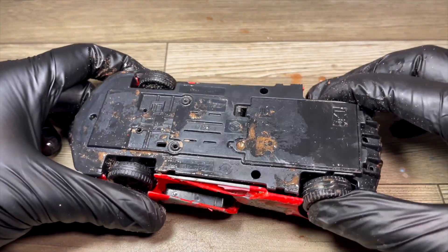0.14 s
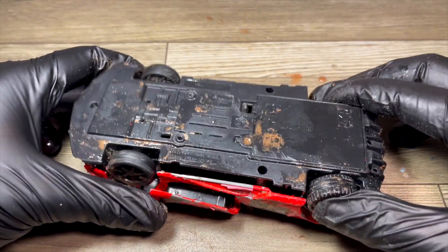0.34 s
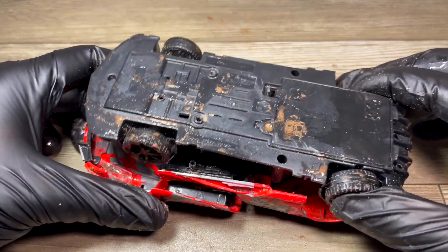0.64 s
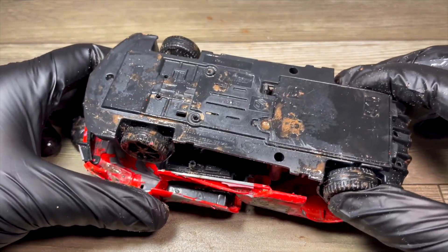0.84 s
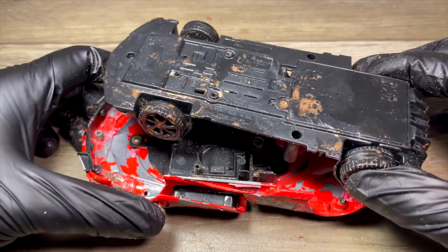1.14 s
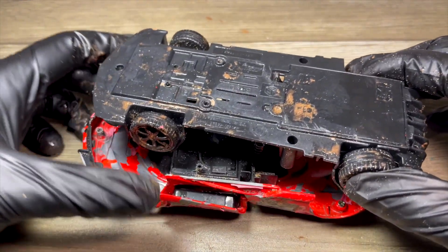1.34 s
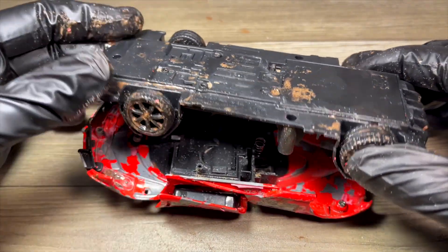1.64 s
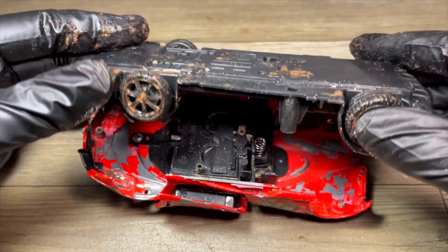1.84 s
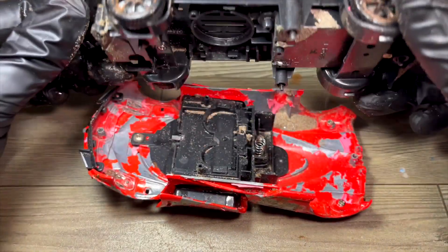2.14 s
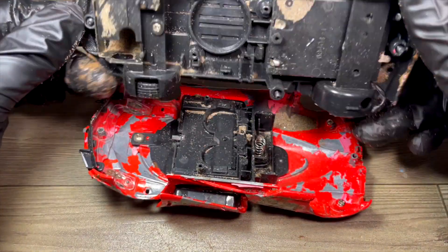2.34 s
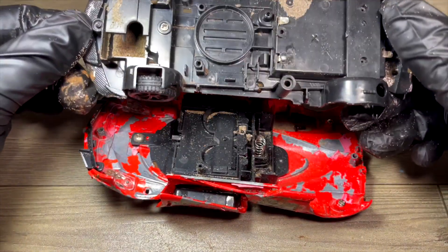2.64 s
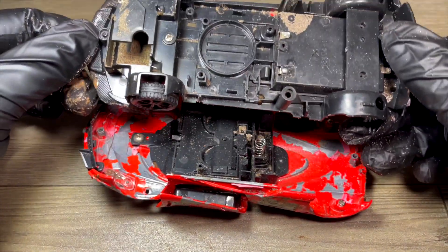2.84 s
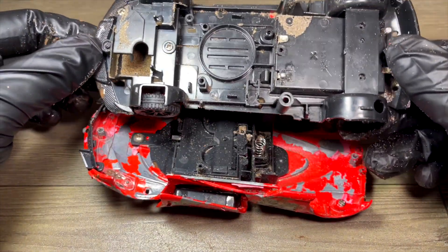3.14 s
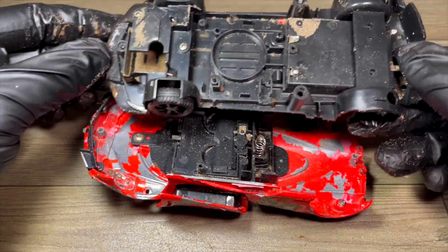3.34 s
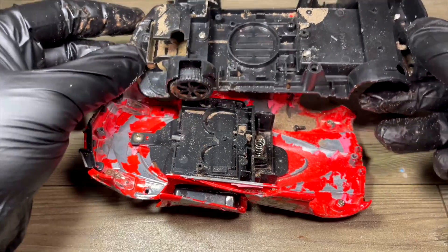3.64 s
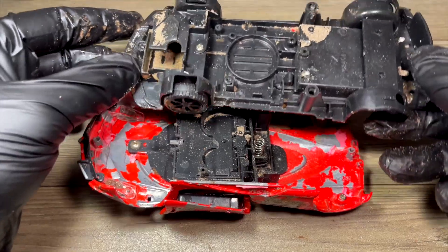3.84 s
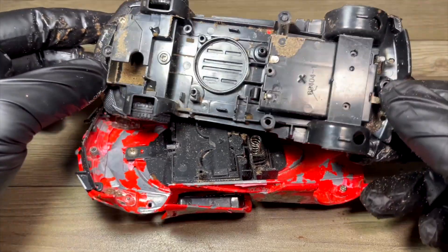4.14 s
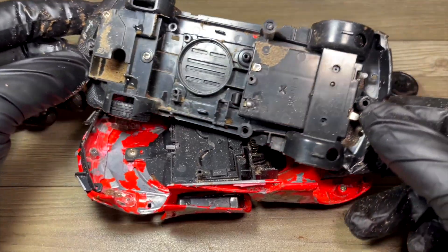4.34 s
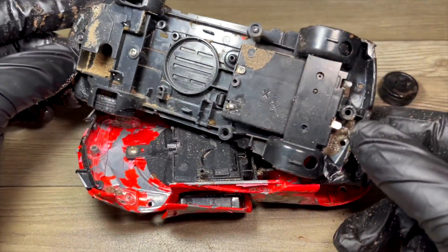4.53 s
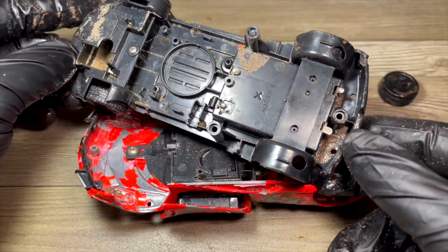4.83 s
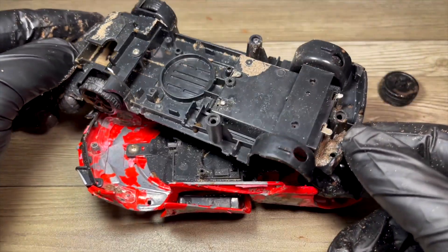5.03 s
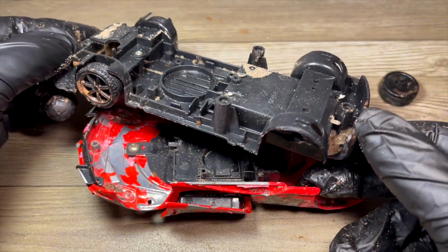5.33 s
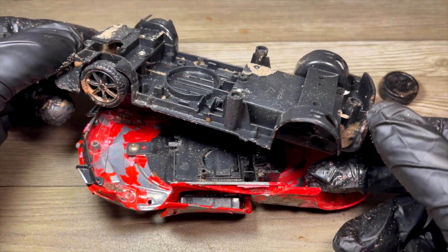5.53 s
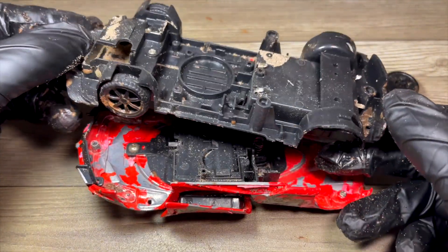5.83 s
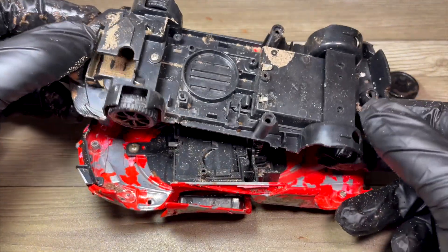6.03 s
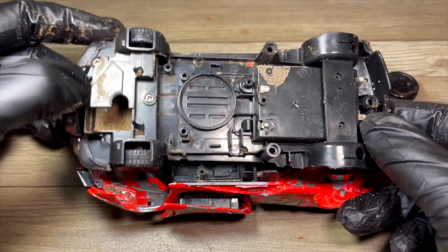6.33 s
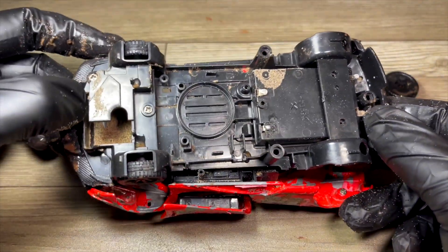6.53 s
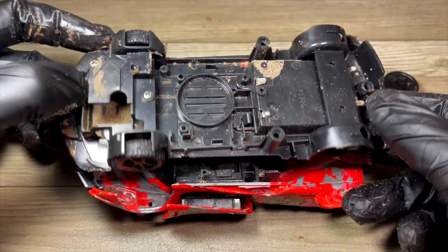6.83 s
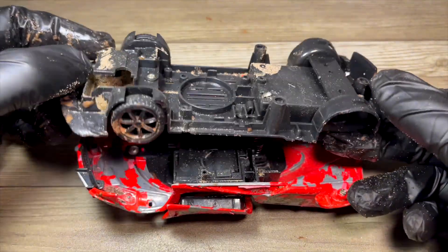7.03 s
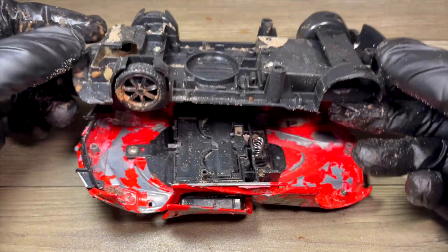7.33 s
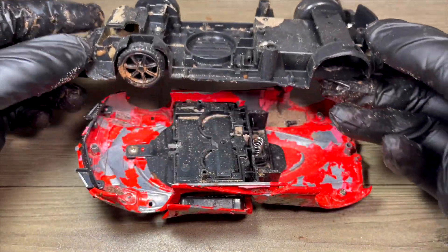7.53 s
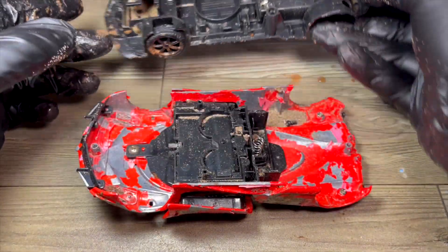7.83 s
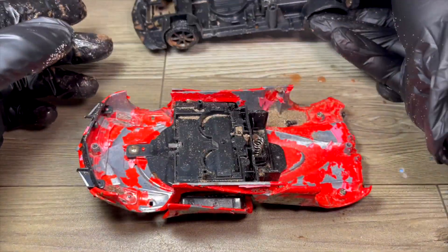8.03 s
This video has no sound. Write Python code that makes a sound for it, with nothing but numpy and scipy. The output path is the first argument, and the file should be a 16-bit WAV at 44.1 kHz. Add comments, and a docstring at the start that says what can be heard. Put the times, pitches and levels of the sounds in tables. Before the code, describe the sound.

Thin plastic parts click, scuff and rub in gloved hands over a wooden table. It begins busy, with a loud snap and dull thumps, thins out, then has two bright snaps near the third second. Light grit and drags lead to a strong crack and short clatter, then gentle scraping and a few last ticks. Dry, close stereo pickup with soft low room rumble.

```python
"""Gloved hands and a toy car chassis

Rubber-gloved hands lift the plastic chassis off a toy car body, turn it over and set it aside on a wooden table.
Clips and loose parts click as short rattles of force through damped modes; scuffs, drags and gloves drive
plastic with gritty noise. Dull thumps are resonant noise, the low room rumble is shaped noise,
and a close two-port microphone colours it all.
"""
import sys
import numpy as np
from scipy import signal
from scipy.fft import rfft, irfft, next_fast_len
from scipy.io import wavfile
from scipy.ndimage import uniform_filter1d

SR = 44100
rng = np.random.default_rng(int(sys.argv[2]) if len(sys.argv) > 2 else 0)


def unload_audio(sound):
    """Save the sound as a 16-bit wav file, at the path given as the first command line argument."""
    columns = np.transpose(np.atleast_2d(sound))
    # keep every value between -1 and 1, then stretch to whole-number steps
    steps = np.round(np.clip(columns, -1, 1) * 32767)
    wavfile.write(sys.argv[1], SR, steps.astype(np.int16))


N = 360297

# gloves sliding on plastic: (time [s], hiss level [dB], chassis ring before trim [dB re hiss])
RUBBING = [(0, -50.5, -4.5), (.33, -53.5, -0.5), (.42, -49.5, -0.5), (.54, -70.5, -1.5), (.8, -65, -4.5),
           (.92, -75.5, 1.5), (1.0, -67, -1.5), (1.23, -83, 2.5), (1.29, -65, -10), (1.39, -62.5, -10.5),
           (1.52, -74, -3.5), (1.58, -58, -18), (2.14, -46.5, -13.5), (2.55, -54.5, -11),
           (2.66, -69, -13.5), (2.74, -61.5, -16.5), (2.9, -57, -20), (3.16, -49.5, -13),
           (3.57, -59.5, -10), (3.75, -56.5, -8.5), (4.43, -55, -7.5), (4.71, -65.5, 1), (5.0, -60, -10.5),
           (5.48, -65, -19.5), (5.56, -72, -15.5), (5.8, -57, -28.5), (6.1, -67, -14), (6.32, -55, -9.5),
           (6.58, -66.5, -0.5), (6.8, -57.5, -13.5), (6.95, -55, -13), (7.0, -65.5, -9.5),
           (7.14, -56, -10.5), (7.24, -72, -2.5), (7.53, -70.5, 1.5), (7.85, -59, -5.5), (7.9, -78, 0),
           (8.17, -79, -8)]
# hollow low modes of the chassis: (frequency [Hz], level [dB], undamped t60 [s])
HOLLOW_MODES = [(647.25, -14.5, 0.033), (1093, -6.5, 0.027), (1403.6, -2, 0.011), (1504, -9.5, .2),
                (1636.4, -7, .02), (1970, -3, 0.011), (2230, -4, 0.0076)]
# bright plate modes of the chassis: (frequency [Hz], level [dB], undamped t60 [s])
PLATE_MODES = [(2904, -5.5, 0.0068), (3085, -8.5, 0.061), (3468, -10.5, .01), (3943, -3, 0.0092),
               (4540, -6.5, 0.0045), (4880, -4.5, 0.0051), (5200, -5, 0.014), (5780, -10.5, 0.0066)]
PORTS = np.array([[1], [-1]])  # left, right


def undb(db):
    """Decibels to gain."""
    return 10 ** (np.asarray(db) / 20)


def unit(x):
    """Scale to rms 1."""
    return x / np.sqrt(np.mean(x ** 2))


def curves(table):
    """Columns of a time table, one value a sample."""
    s, *columns = np.transpose(table)
    return [np.interp(np.arange(N) / SR, s, column) for column in columns]


def over_hz(table, hz):
    """A spectrum read on a log-frequency axis."""
    f, value = np.transpose(table)
    return np.interp(np.log(hz + 1), np.log(f + 1), value)


def walk(rate):
    """Random levels held 1 / rate s and slewed; spread a little under 1."""
    hold = int(SR / rate)
    steps = np.repeat(rng.standard_normal(N // hold + 1), hold)
    return uniform_filter1d(steps, hold)[:N]


def grit(size, grain_db):
    """Friction force: noise in millisecond grains of very uneven size."""
    grains = np.minimum(rng.exponential(size=size // 44 + 1), 4.5)
    return rng.standard_normal(size) * undb(grain_db * np.repeat(grains, 44)[:size])


def modes(table, hz, share, spread_db):
    """Response of damped modes; each one's share sets its sign and, through the spread, its strength."""
    f, db, t60 = np.transpose(table)
    damp = np.log(1000) / t60 / (2 * np.pi)
    gain = undb(db + spread_db * share) * np.sign(np.sin(1000 * share))
    damp, f = damp[:, None], f[:, None]
    return gain @ (damp / (damp + 1j * (hz - f)) + damp / (damp + 1j * (hz + f)))


def nearness(f, ring_hz, octaves):
    """How near frequencies lie to a pitch: 1 on it, falling to 0 within a few widths."""
    return np.exp(-(np.log2(f / ring_hz) / octaves) ** 2)


def favour(table, ring_hz, focus_db, octaves):
    """The modes near a given pitch ring louder: the place of the contact."""
    return [(f, db + focus_db * nearness(f, ring_hz, octaves), t60) for f, db, t60 in table]


def edge(hz, corner_hz):
    """Second-order high-pass: the bright crack of a contact."""
    b, a = signal.butter(2, 2 * np.pi * corner_hz, "high", analog=True)
    return signal.freqs(b, a, 2 * np.pi * hz)[1]


def darken(hz, corner_hz):
    """Steep low-pass: darkens the sound above a corner frequency."""
    b, a = signal.cheby1(8, 1, 1, analog=True)
    return signal.freqs(b, a, hz / corner_hz)[1]


def room(flicker_db=2.5, follow=0.49, apart_hz=1500):
    """Low rumble that swells with its level curve, over a faint wavering hush; the bass is nearly alike at both ports."""
    # rumble of the room, lower later on: (time [s], level [dB])
    rumble_levels = [(0, -47.5), (1.8, -51), (2.8, -48.5), (5.9, -55.5), (8.17, -52.5)]
    # tone of the room noise, before it is scaled to the rumble: (frequency [Hz], density [dB per Hz])
    room_tone = [(8.8, -34), (15, -12), (50, 0), (90, -2.5), (128, -22), (170, -33), (268, -31), (400, -47),
                 (712, -52), (1330, -49), (4670, -53), (9000, -55), (12000, -70)]
    hz = np.fft.rfftfreq(N, 1 / SR)
    mid, side = rfft(rng.standard_normal((2, N))) * undb(over_hz(room_tone, hz))
    both = mid + np.minimum(0.025 + hz / apart_hz, 1) * side * PORTS
    low = 1 / (1 + (hz / 130) ** 4)
    scale = np.std(irfft(mid * low, N))
    rumble_db, = curves(rumble_levels)
    rumble = irfft(both * low, N) * undb(rumble_db + flicker_db * walk(8.4))
    # the hush follows only part of the rumble's rise and fall
    mean_db = np.mean(rumble_db)
    hush_db = mean_db + follow * (rumble_db - mean_db)
    hush = irfft(both * (1 - low), N) * undb(hush_db + flicker_db * walk(5.8))
    return (rumble + hush) / scale


def thumps(t60=.09, rise_s=0.005, width=0.22, middle_hz=188, scatter=0.14):
    """The table top gives a short dull shudder under each push of the hands: noise through one resonance."""
    # hands on the table: (time [s], level before a 10 dB lift [dB])
    thump_table = [(.16, -58), (.219, -54), (.4, -61.5), (.713, -66), (1.079, -60), (3.723, -56),
                   (3.867, -64), (4.072, -60), (4.3, -61.5), (4.36, -59.5), (4.42, -60), (4.999, -67),
                   (5.293, -65), (6.5, -67), (6.82, -67.5), (7.07, -66), (8.0, -67)]
    t = np.arange(int(t60 * SR)) / SR
    out = np.zeros(N + len(t))
    for s, level_db in thump_table:
        hz = middle_hz * np.exp(scatter * rng.standard_normal())
        b, a = signal.iirpeak(hz, 1 / width, SR)
        shudder = signal.lfilter(b, a, rng.standard_normal(8192))[-len(t):]
        decay = undb(level_db + 10.0 - 60 * t / t60)
        i = int(s * SR)
        out[i:i + len(t)] += decay * (1 - np.exp(-t / rise_s)) * unit(shudder)
    return out[:N]


def drags(grain_db=4.0, spread_db=0.0):
    """Stick-slip grit between chassis and car body rings the damped modes of the shell."""
    # chassis across the body: (time [s], swell length, cut at 0.19 s [s], level [dB])
    drag_table = [(4.277, 0.05, -57), (4.398, 0.1, -54), (6.127, 0.3, -68.5), (6.236, 0.1, -59),
                  (6.278, 0.1, -59), (6.365, 0.3, -61.5)]
    # what the body shell rings with: (frequency [Hz], level [dB], t60 [s])
    shell_modes = [(1173, -8.5, 0.016), (1315, -7, 0.022), (2520, -7.5, 0.03), (3090, -3, 0.0099),
                   (3480, -2.5, 0.0084), (5200, -2.5, 0.01636), (6840, -9.5, 0.0089)]
    size = 8192
    t, hz = np.arange(size) / SR, np.fft.rfftfreq(size, 1 / SR)
    out = np.zeros(N + size)
    for s, length, db in drag_table:
        swell = np.sin(np.pi * np.minimum(t / length, 1)) ** 0.49
        force = rfft(grit(size, grain_db) * swell)
        ring = irfft(force * modes(shell_modes, hz, rng.standard_normal(len(shell_modes)), spread_db))
        i = int(s * SR)
        # the level holds over the length of the drag, not over the whole window
        out[i:i + size] += undb(db) * np.sqrt(size / SR / length) * unit(ring)
    return out[:N]


def scuffs(grain_db=3.8, hiss_hz=4200, dark_hz=11800, focus_db=19, octaves=.27):
    """A part drags over another: gritty force swells and stops, ringing most the modes near the contact."""
    # plastic on plastic: (time [s], length [s], hiss level [dB], ring level [dB], strongest ring [Hz])
    scuff_table = [(0.12, 0.02, -76, -65, 3930), (0.143, 0.032, -57.5, -56.5, 3300),
                   (0.236, 0.035, -56.5, -48, 1250), (0.288, 0.03, -61, -62, 1640),
                   (0.309, 0.04606, -61, -80, 3850), (0.383, 0.026, -58, -52, 1300),
                   (1.309, 0.082, -65, -71, 4874), (1.724, 0.077, -55, -57, 3866),
                   (2.064, 0.053, -56, -58.5, 4800), (2.315, 0.054, -54, -63, 2903),
                   (2.425, 0.079, -62, -55, 2000), (3.198, 0.078, -76.5, -60, 4880),
                   (3.275, 0.03826, -64.5, -67, 4620), (3.419, 0.1, -58.5, -62, 4915),
                   (4.07, 0.026757, -59, -56.5, 2903), (4.193, 0.015, -70, -72.5, 2830),
                   (5.239, 0.036, -63, -61, 1637), (5.612, 0.056, -70.5, -75, 4865),
                   (5.682, 0.061, -80, -74.5, 1500), (5.769, 0.055, -66.5, -68, 1700),
                   (5.831, 0.045, -73, -75, 1500), (5.871, 0.038, -67.5, -61.5, 1680),
                   (6.168, 0.024, -68, -71, 4730), (6.497, 0.01925, -76.5, -78.5, 1900),
                   (6.835, 0.056, -68, -61, 4720), (6.894, 0.08137, -63, -73, 1400),
                   (6.9, 0.059, -80, -64.5, 5200), (7.124, 0.1, -77.5, -70, 4600),
                   (7.032, 0.08546, -61.5, -68.5, 1490), (7.3, 0.18, -91, -74, 2800),
                   (7.551, 0.03112, -75.5, -73.5, 3940), (7.709, 0.041, -71, -76, 3970),
                   (7.794, 0.076, -68.5, -75, 2886)]
    size = 8192
    t, hz = np.arange(size) / SR, np.fft.rfftfreq(size, 1 / SR)
    chassis = HOLLOW_MODES + PLATE_MODES
    out = np.zeros(N + size)
    for s, length, hiss_db, ring_db, ring_hz in scuff_table:
        swell = np.sin(np.pi * np.minimum(t / length, 1)) ** 0.51
        force = rfft(grit(size, grain_db) * swell)
        near = nearness(np.transpose(chassis)[0], ring_hz, octaves)
        hiss = irfft(force * edge(hz, hiss_hz) ** 2 * darken(hz, dark_hz))
        ring = irfft(force * modes(chassis, hz, near, focus_db))
        scuff = undb(hiss_db) * unit(hiss) + undb(ring_db) * unit(ring)
        i = int(s * SR)
        out[i:i + size] += np.sqrt(size / SR / length) * scuff
    return out[:N]


def gloves(grain_db=2.5, grip_db=3, slip_db=2, patchy_db=3, split_hz=6500, hiss_hz=4500, dark_hz=11600,
           wander_db=5, damping=.8, ring_trim_db=-11.5):
    """Rubber sticks and slips in dense uneven grains that hiss and ring the chassis, damped by the fingers."""
    level_db, ring_db = curves(RUBBING)
    hz = np.fft.rfftfreq(N, 1 / SR)
    force = rfft(grit(N, grain_db) * undb(grip_db * walk(25) + slip_db * walk(90)))
    hiss = unit(irfft(force * edge(hz, hiss_hz) * darken(hz, dark_hz), N))
    # the duller and the brighter part of the hiss come and go apart
    dull = irfft(rfft(hiss) / (1 + (hz / split_hz) ** 6), N)
    bright = hiss - dull
    out = undb(level_db) * (dull * undb(patchy_db * walk(12)) + bright * undb(patchy_db * walk(12)))
    # the fingers wander, so each mode swells and fades alone
    for mode_hz, db, t60 in HOLLOW_MODES + PLATE_MODES:
        ring = irfft(force * modes([(mode_hz, 0, damping * t60)], hz, np.ones(1), 0), N)
        out += undb(level_db + ring_db + db + ring_trim_db + wander_db * walk(4.8)) * unit(ring)
    return out


def ticks(count=50, over_rub_db=1, spread_db=2.5, hollow_db=-20, plate_db=-9.5):
    """Faint ticks of grit under the gloves: rows like the clicks, at random moments, riding on the rubbing level."""
    s, low_hz, mid_hz = rng.uniform([0, 1000, 2900], [N / SR, 2300, 5600], (count, 3)).T
    rub_db = curves(RUBBING)[0][(s * SR).astype(int)]
    peak_db = rub_db + over_rub_db + spread_db * rng.exponential(size=count)
    return [(at, db, hollow_db, low, plate_db, mid) for at, db, low, mid in zip(s, peak_db, low_hz, mid_hz)]


def clicks(crack_hz=5500, dark_hz=12500, hard_db=-14, spread_db=1.5, hollow_db=3, plate_db=3, pan_db=2.5,
           chatter_db=-25, chatter_s=0.22, chatter_grain_db=2.5, focus_db=8, octaves=0.12):
    """Each contact is a short rattle of force that cracks and rings the chassis."""
    # clips and loose parts: (time [s], crack peak [dB], hollow ring before trim [dB re crack],
    # its strongest pitch [Hz], plate ring before trim [dB re crack], its strongest pitch [Hz])
    click_table = [(0.0125, -33, -11.5, 1090, -12, 5362), (.0567, -24, -7.5, 1420, -2.5, 3980),
                   (0.0792, -36, 2.5, 1404, -18, 3190), (0.1295, -41.5, -2, 2260, -11, 4240),
                   (.179, -33.5, -9.5, 2218, -24, 4516), (0.2085, -24.5, -17.5, 2208, -24, 3180),
                   (0.2224, -11.5, -18, 2160, -7, 2900), (.2408, -29, -4.5, 1414, -24.5, 2790),
                   (0.2486, -32.5, -11, 1232, -25.5, 2850), (.297, -42, -4.5, 1399, -11, 3399),
                   (.354, -40.5, -22, 1400, -24, 4200), (0.37, -26, -21, 1060, -14.5, 4170),
                   (0.4174, -26, -12.5, 2303, -14.5, 4449), (0.466, -35.5, -40, 2372, -11, 3770),
                   (0.6074, -47, -15.5, 1100, -29.5, 2946), (0.656, -50, -26, 1259, -33.5, 4590),
                   (0.7109, -54, 3.5, 1165, -12, 4400), (.979, -31, -20, 2205, -7, 4799),
                   (1.0817, -36.5, -9, 2250, -4.5, 5240), (1.173, -54, -22, 673, -7.5, 4270),
                   (1.26, -40.5, -14.5, 1140, -6.5, 2980), (1.284, -46.5, -16.5, 1187, -10, 4820),
                   (1.6818, -43.5, -6, 1511, -2, 4573), (1.9671, -30.5, -48, 2250, -9, 5134),
                   (1.9741, -32, -41, 2256, -7.5, 5230), (2.1274, -30.5, -20, 1400, -10.5, 4860),
                   (2.167, -40, -33, 1230, -20, 5120), (2.5092, -22.5, -51.5, 2161, -26, 5070),
                   (2.5245, -33, -32, 1764, -14, 5606), (2.5612, -11.5, -48, 2210, -18.5, 3130),
                   (2.7857, -11, -16.5, 1440, -8, 5130), (2.8437, -34.5, -10.5, 1410, -1.5, 4760),
                   (2.9471, -32.5, -14.5, 1402, -1.5, 4630), (3.0575, -42.5, -42.5, 1510, -8, 4940),
                   (3.097, -40, -46, 2200, -21.5, 4720), (3.5194, -41, -12.5, 1970, 1.5, 5300),
                   (3.7193, -37, -15, 1120, -3, 3000), (3.8652, -37, -19, 1129, -5, 4442),
                   (3.909, -41.5, -13.5, 660, -5, 5270), (4.0909, -36.5, -7.5, 1500, -15, 2980),
                   (4.2356, -37.5, -21, 1457, -13, 5100), (4.326, -50, 4, 1500, 9.5, 3100),
                   (4.406, -46.5, -13, 1130, 6, 3475), (4.474, -47, -8.5, 1156, 10, 5260),
                   (4.54, -42.5, 3, 1290, 8.5, 3100), (4.596, -37.5, -25, 1971, -37.5, 5710),
                   (4.7264, -32, -21, 1390, -40, 4175), (4.9975, -44, -10, 1134, 3, 5470),
                   (5.249, -47, -2, 1528, -6.5, 2904), (5.2558, -36, -12.5, 1390, -2.5, 5610),
                   (5.278, -46, -6.5, 1987, -2.5, 5670), (5.2947, -6, -24, 1416, -11.5, 3000),
                   (5.302, -26, -32.5, 1980, -16, 3034), (5.314, -29, -24, 1571, -21.5, 5600),
                   (5.3286, -37, -19, 1485, -12.5, 3058), (5.4087, -17, -19, 1423, -12, 4391),
                   (5.4404, -23, -24, 1413, -14, 3260), (5.458, -38.5, -15, 1440, -9, 3154),
                   (5.469, -38, -23, 1420, -12, 3240), (5.477, -41, -14, 1440, -5.5, 3240),
                   (6.4978, -48, -7, 1470, -3.5, 3477), (6.6291, -24.5, -19, 1962, -7, 2870),
                   (6.736, -50, -43.5, 1527, 3.5, 4954), (6.794, -35.5, -32, 1120, -22, 2927),
                   (6.8197, -41.5, -18, 1580, -3, 3060), (7.042, -42, -30, 1480, -19, 5080),
                   (7.855, -55, -33, 1490, -30, 5570), (7.9801, -38, -19, 1570, -12.5, 5555),
                   (7.986, -41, -18, 1565, -14, 5603), (8.0, -46.5, -1, 1401, -10, 5240),
                   (8.029, -33, -19, 1423, -27, 5615), (8.04, -42, -20, 1410, -17, 4507)]
    # build-up and rattle time of a middling contact, and the spread of the rattle time as a share
    middling_db, middling_rise_s, middling_t60_s, t60_scatter = -30, 0.0018, 0.013, .15
    longer_db = 0.087  # extra duration, dB per dB of peak
    size = 4096
    t, hz = np.arange(size) / SR, np.fft.rfftfreq(size, 1 / SR)
    fade = np.cos(np.pi * t * SR / size / 2)
    out = np.zeros((2, N + size))
    for s, peak_db, hollow, hollow_pitch, plate, plate_pitch in click_table + ticks():
        # a harder blow builds up and rattles longer
        longer = undb(longer_db * (peak_db - middling_db))
        rise_s = middling_rise_s * longer
        t60 = middling_t60_s * longer * np.exp(t60_scatter * rng.standard_normal())
        after = np.maximum(t - rise_s, 0)
        # the loose part chatters on faintly after the blow
        bounces = unit(np.abs(grit(size, chatter_grain_db)))
        chatter = bounces * undb(chatter_db - 60 * after / chatter_s)
        shape = np.minimum(t / rise_s, 1) * (undb(-60 * after / t60) + chatter)
        force = rfft(rng.standard_normal(size) * shape * fade)
        # the highest treble opens up with the level of the click
        dark = darken(hz, dark_hz)
        reach = dark + undb(min(.5 * (peak_db - hard_db), 0)) * (1 - dark)
        crack = unit(irfft(force * reach * edge(hz, crack_hz) * edge(hz, crack_hz / 3)))
        rings = []
        for table, pitch in ((HOLLOW_MODES, hollow_pitch), (PLATE_MODES, plate_pitch)):
            share = rng.standard_normal(len(table))
            body = modes(favour(table, pitch, focus_db, octaves), hz, share, spread_db)
            rings.append(unit(irfft(force * body)))
        click = crack + undb(hollow + hollow_db) * rings[0] + undb(plate + plate_db) * rings[1]
        place_db = pan_db * rng.standard_normal() * PORTS / 2
        # the peak is that of the crack, averaged over a millisecond
        crack_peak = np.max(uniform_filter1d(np.abs(crack), size=44))
        i = int(s * SR)
        out[:, i:i + size] += click * undb(peak_db + place_db) / crack_peak
    return out[:, :N]


def scatter_off_table(t60=.045, level_db=-16, apart_gain=2.0):
    """Short decaying noise response: sound scattered off the table and car body, partly its own at each port."""
    t = np.arange(int(t60 * SR)) / SR
    decay = undb(-60 * t / t60) * np.minimum(t / 0.005, 1)
    shared, apart = rng.standard_normal((2, len(t))) * decay
    # the ports hear different scatter only below the treble
    apart = signal.sosfilt(signal.butter(4, 6500, fs=SR, output="sos"), apart)
    return undb(level_db) * (shared + apart_gain * apart * PORTS) / np.sqrt(np.sum(shared ** 2))


def scene():
    """Clicks, scuffs, drags and rubbing with a short scatter off the table and car body, over thumps and room."""
    background = room() + thumps()
    near = drags() + scuffs() + gloves() + clicks()
    # thin plastic radiates little bass
    near = signal.sosfilt(signal.butter(3, 600, "high", fs=SR, output="sos"), near)
    scattered = signal.fftconvolve(near, scatter_off_table(), axes=1)[:, :N]
    return background + near + scattered


def record(dry):
    """Two ports with their own lag and balance, the capsule's colour, then the cut at the top."""
    # colour of the capsule: (frequency [Hz], level [dB])
    colour = [(1000, -7), (6000, -11.5), (7600, -9.5), (8800, -5.5), (10000, -7.5), (10700, -1.5),
              (11250, -2), (11900, -15.5), (13000, -17.5), (13800, -29), (15000, -25.5), (16400, -34)]
    # phase by which the left port leads: (frequency [Hz], lead [rad])
    lead = [(0, 0), (1400, .5), (2760, .9), (3530, .7), (5430, .7), (6800, -.1), (7490, 1.1), (8870, -.6),
            (10300, -3.14), (11500, -5.5), (12700, -6.9), (13500, -9.4), (16500, -13.1)]
    # balance of the ports: (frequency [Hz], left minus right [dB])
    tilt = [(60, -2.5), (110, 0.5), (200, -3), (380, -1), (700, 2.5), (1290, 2), (2380, 2.5), (4400, 4.5),
            (8120, 2.5), (15000, -2.5)]
    size = next_fast_len(N + 4096)
    hz = np.fft.rfftfreq(size, 1 / SR)
    side = PORTS / 2
    gain = undb(over_hz(colour, hz) + side * over_hz(tilt, hz))
    phase = side * np.interp(hz, *np.transpose(lead))
    heard = irfft(rfft(dry, size) * gain * np.exp(1j * phase), size)[:, :N]
    top_hz = 16700
    return signal.sosfilt(signal.ellip(8, .2, 70, top_hz, fs=SR, output="sos"), heard)


dry = scene()
out = record(dry)
unload_audio(out)
```